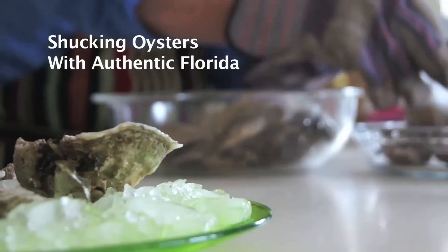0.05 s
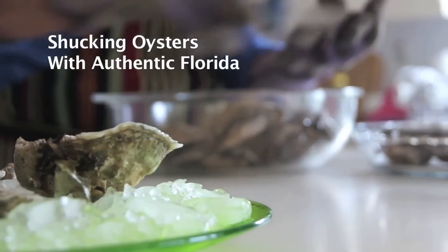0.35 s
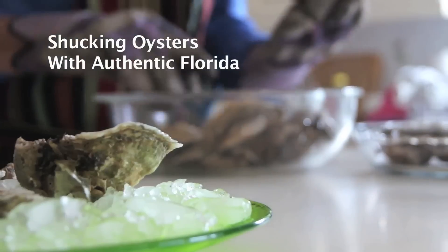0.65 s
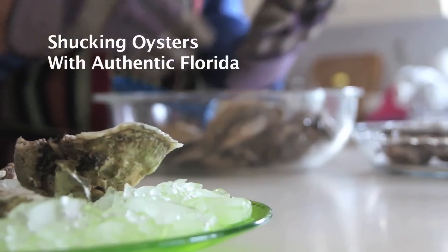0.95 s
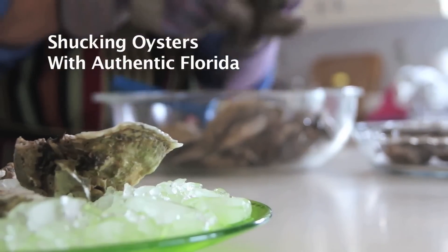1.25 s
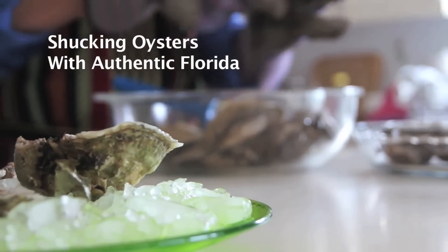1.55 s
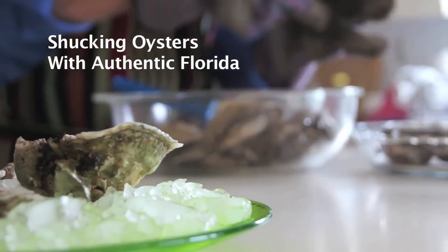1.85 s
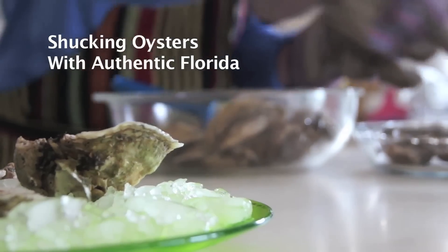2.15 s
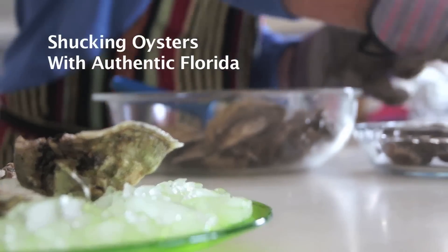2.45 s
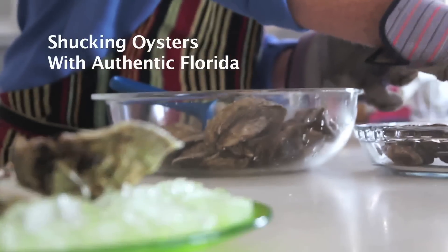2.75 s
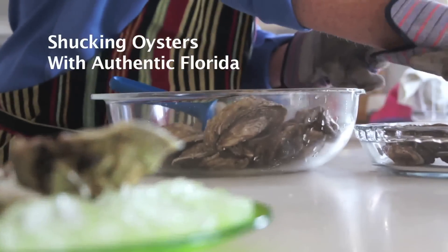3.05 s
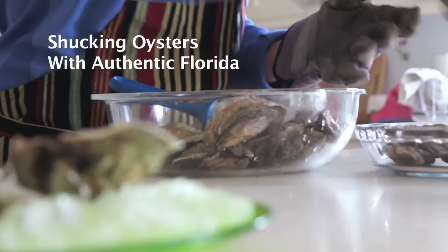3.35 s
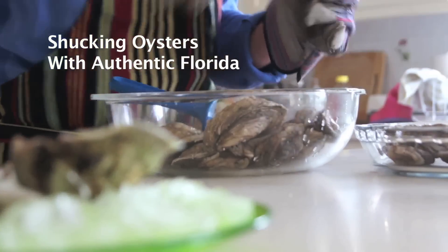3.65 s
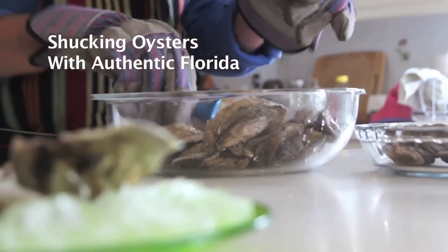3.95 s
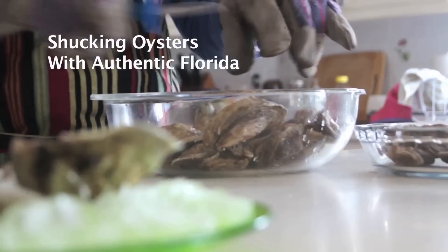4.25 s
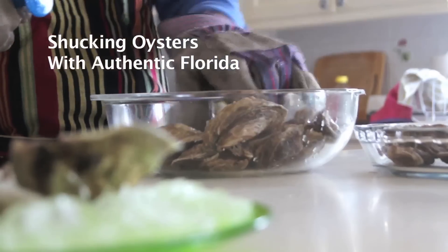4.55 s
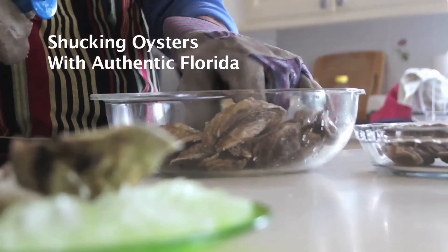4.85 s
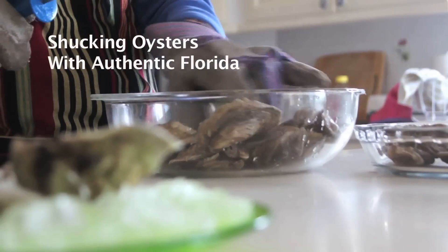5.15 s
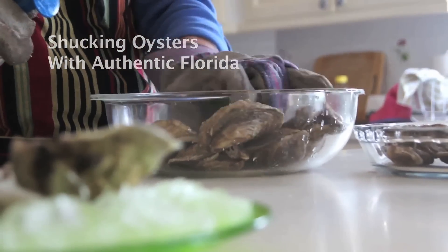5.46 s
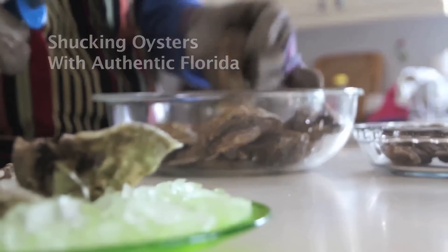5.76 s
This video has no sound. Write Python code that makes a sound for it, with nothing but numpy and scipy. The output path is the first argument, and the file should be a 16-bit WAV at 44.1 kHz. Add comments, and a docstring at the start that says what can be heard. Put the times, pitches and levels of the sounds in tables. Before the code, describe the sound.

Sharp shell clinks and a falling steel knife, followed by a hand rummaging through hollow, knocking oysters in a hard-walled kitchen.

```python
"""Clinks, knocks and scrapes of oysters being shucked on a stone counter in a hard-walled kitchen.
An empty top shell bounces, the steel knife drops among whole oysters, half shells clink into a glass
dish. The knife is picked up, and a gloved hand rummages in the bowl of oysters, which knock and scrape.
Hard contacts crack and ring; closed, wet oysters thud. Strong room sound over a faint hiss."""
import sys
import numpy as np
from scipy import signal
from scipy.fft import rfft, irfft, next_fast_len
from scipy.io import wavfile

SR = 44100
rng = np.random.default_rng(int(sys.argv[2]) if len(sys.argv) > 2 else 0)


def generate_wav(sig):
    """Save sig (samples, or channels by samples) to the path in sys.argv[1] as 16-bit PCM at SR."""
    pcm = np.round(np.clip(np.atleast_2d(sig).T, -1, 1) * 32767).astype(np.int16)
    wavfile.write(sys.argv[1], SR, pcm)


N = 260549
BLOW_SAMPLES = 2 ** 15
AGE_S = np.arange(BLOW_SAMPLES) / SR

# Stereo width of the room. Each row: frequency in Hz, side level against the middle in dB.
ROOM_WIDTH = [(100, -11), (300, -9.5), (600, -7.5), (1200, -4.5), (2500, 0.5), (12000, 1)]
# Oyster spectra: hollow body, lips, flakes. Each row: frequency in Hz, relative level in dB.
THUD_SPECTRUM = [(40, -37), (110, -18.5), (190, -16.5), (380, -8), (540, -6), (720, 0.5), (1100, -1.5),
                 (1500, -9), (2500, -30.5), (4000, -32.5), (12000, -60)]
CLACK_SPECTRUM = [(40, -34), (1100, -8), (1500, 0.5), (1830, 10), (2100, -0.5), (2800, -9), (3600, -19.5),
                  (12000, -64)]
GRIT_SPECTRUM = [(40, -40.5), (1500, -12), (2800, 9.5), (3400, -1.5), (4300, 4), (6500, -8), (9000, -16.5),
                 (13500, -36)]


def undb(db):
    """Decibels to gain."""
    return 10 ** (np.asarray(db) / 20)


def along(points, hz):
    """Read (Hz, value) points on a log-frequency axis."""
    point_hz, value = np.transpose(points)
    return np.interp(np.log(hz + 1), np.log(point_hz), value)


def bins_hz(size):
    """Frequencies of a real spectrum."""
    return np.arange(size // 2 + 1) * SR / size


def colour(x, spectrum, tilt_db_per_oct=0):
    """Minimum-phase filter with the given spectrum, tilted above 3 kHz."""
    size = next_fast_len(len(x) + BLOW_SAMPLES, True) // 2 * 2
    hz = bins_hz(size)
    db = along(spectrum, hz) + tilt_db_per_oct * np.log2(np.maximum(hz / 3000, 1))
    cepstrum = irfft(np.log(undb(db)))
    cepstrum[1:size // 2] *= 2
    cepstrum[size // 2 + 1:] = 0
    return irfft(rfft(x, size) * np.exp(rfft(cepstrum)))[:len(x)]


def butter(x, order, hz, kind="low"):
    """Butterworth filter."""
    return signal.sosfilt(signal.butter(order, hz, kind, fs=SR, output="sos"), x)


def unit(x):
    """Scale to rms 1."""
    return x / np.sqrt(np.mean(x ** 2))


def punch(x):
    """Scale a blow to the energy of 4 ms at rms 1."""
    return x / np.sqrt(np.sum(x ** 2) / (0.004 * SR))


def add(track, start_s, sound):
    """Mix a sound in at start_s."""
    start = max(int(start_s * SR), 0)
    track[start:start + len(sound)] += sound[:max(N - start, 0)]


def fade(t60_s, rise_s=0.0001):
    """Quick rise, exponential decay."""
    return np.exp(-np.log(1000) * AGE_S / t60_s) * (1 - np.exp(-AGE_S / rise_s))


def room_noise(size):
    """Stereo noise, alike in the bass and apart in the treble."""
    mid, side = rfft(rng.standard_normal((2, size)))
    width = undb(along(ROOM_WIDTH, bins_hz(size)))
    side = side * width
    return irfft(np.array([mid + side, mid - side]) / np.sqrt(1 + width ** 2), size)


def hiss(level_db=-56.5):
    """Steady air noise of the room and the microphone's own hiss."""
    # Each row: frequency in Hz, relative level in dB.
    spectrum = [(26, -45), (45, -15), (92, -31), (236, -8.5), (266, -12), (300, -7), (574, -4), (784, -4.5),
                (1100, -6), (1400, -11), (1910, -12), (2420, -17), (2670, -16), (4020, -15.5), (14000, -33)]
    return undb(level_db) * unit(np.array([colour(x, spectrum) for x in room_noise(N)]))


def kitchen(x, tail_db=-1.5, scatter_db=-3, left_db=1.3):
    """Direct sound, a few hard reflections, scatter from things on the counter, a diffuse tail."""
    # Reverberation. Each row: frequency in Hz, T60 in seconds.
    decays = [(150, 0.57), (400, 0.88), (1000, 0.87), (2800, 0.83), (7000, 0.72), (13000, 0.36)]
    # Counter and cupboard reflections. Each row: delay in seconds, left gain in dB, right gain in dB.
    echoes = [(.0057, -6.5, -4), (0.0105, -10, -7.5), (0.0192, -17, -9.5), (0.028, -10.5, -11)]
    noise_spectrum = rfft(room_noise(BLOW_SAMPLES))
    tail = 0
    for band_hz, t60_s in decays:
        band = along([(hz, hz == band_hz) for hz, _ in decays], bins_hz(BLOW_SAMPLES))
        tail = tail + irfft(noise_spectrum * band) * fade(t60_s)
    tail *= 1 - np.exp(-AGE_S / 0.0022)  # build-up
    scatter = room_noise(BLOW_SAMPLES) * fade(t60_s=0.14)
    response = (undb(tail_db) * unit(tail) + undb(scatter_db) * unit(scatter)) / np.sqrt(BLOW_SAMPLES)
    response[:, 0] += 1
    for delay_s, *gains_db in echoes:
        response[:, int(delay_s * SR)] += undb(gains_db)
    return signal.fftconvolve(x[None], response, axes=1)[:, :N] * undb([[left_db], [0]])


def stroke(start_s, length_s, attack_s=0.011, release_s=0.017):
    """A sliding shell takes up speed, holds it while pushed, then comes to rest."""
    age_s = np.arange(N) / SR - start_s
    return np.clip(age_s / attack_s, 0, 1) * np.exp(-np.maximum(age_s - length_s, 0) / release_s)


def skid(start_s=5.155, length_s=0.03, start_hz=4310, rise_hz_per_s=55000, width_hz=1400, db=-51.5):
    """A gritty squeak that rises as a shell's edge speeds up."""
    hz = start_hz + rise_hz_per_s * np.clip(np.arange(N) / SR - start_s, 0, length_s)
    tone = np.sqrt(2) * np.sin(2 * np.pi * np.cumsum(hz) / SR)
    roughness = unit(butter(rng.standard_normal(N), 2, width_hz / 2))
    return undb(db) * stroke(start_s, length_s) * roughness * tone


def scraping(slips_per_s=800, spread_db=3.5, thud_db=-10, clack_db=-16, grit_gain_db=-8):
    """Ridges catch and slip as shells slide: many tiny blows into the same shell bodies."""
    # Pushes. Each row: start in seconds, length in seconds, relative body and grit levels in dB.
    slides = [(0.783, 0.063, -35.5, -45.5), (4.554, 0.012, -31.5, -51), (4.751, 0.024, -32.5, -46.5),
              (4.775, 0.01, -46, -41.5), (4.81, 0.069, -34.5, -55), (4.895, 0.038, -33.5, -57),
              (5.019, .025, -32, -54), (5.085, 0.13, -29, -45.5), (5.31, 0.16, -33.5, -52.5),
              (5.589, 0.073, -33, -55), (5.678, 0.021, -29, -38)]
    body_envelope, grit_envelope = sum(undb([[body_db], [grit_db]]) * stroke(start_s, length_s)
                                       for start_s, length_s, body_db, grit_db in slides)
    sizes = undb(spread_db * np.minimum(rng.exponential(size=N), 4))
    signs = np.sign(rng.standard_normal(N))
    slips = sizes * signs * (rng.random(N) < slips_per_s / SR)
    thud = undb(thud_db) * unit(colour(slips, THUD_SPECTRUM))
    clack = undb(clack_db) * unit(colour(slips, CLACK_SPECTRUM))
    grit = undb(grit_gain_db) * unit(colour(slips, GRIT_SPECTRUM))
    return body_envelope * (thud + clack) + grit_envelope * grit


def ring(modes, draws, detune, scatter_db=0.5):
    """Damped modes: the striking point varies their shares, the load of shells their pitch."""
    hz, db, t60_s = np.transpose(modes)
    share, shift, polarity = draws[:3 * len(modes)].reshape(-1, 3).T
    gains = np.sign(polarity) * undb(db + scatter_db * share)
    gains *= np.sqrt(2 / np.sum(gains ** 2))
    hz = hz * (1 + detune * shift)
    return sum(gain * np.sin(2 * np.pi * mode_hz * AGE_S) * fade(decay_s)
               for gain, mode_hz, decay_s in zip(gains, hz, t60_s))


def clinks(hits, modes, crack_spectrum, crack_t60_s, note_t60_s, detune):
    """Shell meets something hard: the edge cracks, the shell gives a short note, the object rings on."""
    # Each hit: start in seconds, relative level in dB, treble tilt in dB/octave, ring in dB,
    # note in Hz, note in dB. Each mode: frequency in Hz, relative level in dB, T60 in seconds.
    # Each crack_spectrum row: frequency in Hz, relative level in dB.
    track = np.zeros(N)
    for start_s, db, tilt_db_per_oct, ring_db, note_hz, note_db in hits:
        noise, draws = rng.standard_normal((2, BLOW_SAMPLES))
        crack = punch(colour(noise * fade(crack_t60_s), crack_spectrum, tilt_db_per_oct))
        note = undb(note_db) * punch(np.sin(2 * np.pi * note_hz * AGE_S) * fade(note_t60_s))
        ringing = undb(ring_db) * ring(modes, draws, detune)
        add(track, start_s, undb(db) * (crack + note + ringing))
    return track


def top_shell():
    """A thin, empty top shell bounces and rings."""
    # Bounces, shell modes, contact spectrum. Columns as in clinks().
    hits = [(.0195, -16.5, -2, -13.5, 2910, -17), (.038, -31, 1, -7, 3900, 1),
            (.046, -23, -3.5, -10.5, 3000, -10), (.1053, -16.5, -7, -2, 3930, 6),
            (.127, -21.5, -17.5, -5.5, 3270, 0)]
    modes = [(2708, 1.5, 0.07), (2912, 19, 0.11), (3000, -13, 0.15), (3200, -2, 0.047), (3310, -25.5, 0.11),
             (3787, -15, 0.22), (3630, -0.5, .07), (4100, -2.5, 0.06), (4280, -13.5, 0.021),
             (5220, -12.5, 0.081), (6750, -16.5, 0.11)]
    crack_spectrum = [(40, -11), (110, -13), (190, -5.5), (420, -2.5), (600, -2.5), (900, 3.5), (1300, 2),
                      (2000, -8), (3000, -2), (4200, 7.5), (5200, -1.5), (7200, 1), (8300, -16.5),
                      (13000, -19)]
    return clinks(hits, modes, crack_spectrum, crack_t60_s=0.023, note_t60_s=0.026, detune=0.0033)


def knife():
    """The steel knife rings as it lands among the oysters, and faintly when picked up."""
    # Contacts, steel modes, contact spectrum. Columns as in clinks().
    hits = [(.637, -33, 7, -30, 1076, 4), (.642, -17, 1, -31, 1152, -5.5), (.649, -25, 7, -4, 5800, -8),
            (.671, -19.5, 5.5, -18, 5020, -1), (.778, -31, -4, -22, 3584, 1),
            (.839, -29.5, -3, -24, 6720, -3), (3.94, -37, -11, -23, 3214, -26),
            (3.997, -46, -13, -15, 6600, -10)]
    modes = [(3305, 1, 0.14), (4940, -2, 0.18), (5470, -7, 0.16), (6760, -9, 0.25), (7140, -1, 0.16),
             (7900, -7, .05), (9300, -11, 0.14), (12530, -3, .06)]
    crack_spectrum = [(40, -20), (110, -31), (220, -25), (450, -19.5), (1000, -9.5), (2000, -9.5),
                      (4000, -15), (8500, -21), (10000, -29), (13500, -45)]
    return clinks(hits, modes, crack_spectrum, crack_t60_s=0.064, note_t60_s=0.074, detune=0.0012)


def glass_dish(rock_s=0.0057, lip_pitch_ratio=1.47):
    """Half shells land on the thick hinge, then rock onto the thin lip: softer, brighter, higher."""
    # Landings, glass modes, contact spectrum. Columns as in clinks().
    hinges = [(.0995, -17.5, -7.5, 3.5, 1663, 2), (2.5385, -17.5, 1.5, -10.5, 1848, -5),
              (2.7355, -34, -3, -9.5, 1920, -1.5), (2.9505, -13.5, -3, -6, 1690, 0.5),
              (2.960, -18.5, -2, -4, 2757, 6.5), (2.9824, -14.5, -5.5, -3.5, 2733, 5.5),
              (3.007, -26.5, -0.5, -1, 2610, -1.5), (3.027, -17.5, -9.5, -10.5, 1820, -2)]
    modes = [(419.5, -8.5, 0.16), (793.6, -12.5, 0.086), (1639, 1, 0.074), (1845, -18.5, 0.1),
             (2610, -12, .15), (2623, 4, 0.12), (2750, -5.5, 0.47), (2823, 0.5, 0.1), (2800, -11, 0.17),
             (4062, -8.5, 0.12), (4235, -15, 0.11), (4950, -18, .05), (5376, -14.5, 0.14),
             (5620, -13, 0.08), (5930, -21, 0.098), (7150, -22, 0.1023), (8270, -21.5, 0.0618)]
    crack_spectrum = [(40, -12.5), (110, -24.5), (190, -8), (300, -10.5), (420, -1.5), (560, -2),
                      (900, 7.5), (2000, 0.5), (3000, -1.5), (3700, -19), (5400, -12), (7800, -20.5),
                      (9200, -34.5), (13000, -40)]
    lips = [(start_s + rock_s, db - 3.5, tilt + 2, ring_db, note_hz * lip_pitch_ratio, note_db - 3.5)
            for start_s, db, tilt, ring_db, note_hz, note_db in hinges]
    return clinks(hinges + lips, modes, crack_spectrum, crack_t60_s=0.032, note_t60_s=0.026, detune=0.0023)


def oyster_knocks(contact_s=0.00037, thud_db=-7, note_db=-8.5, clack_db=1.5):
    """Closed, wet oysters are heavily damped: hollow thud and note, clack of lips, crunch of flakes."""
    # Each row: start in seconds, relative level in dB, shell note in Hz,
    # edge in dB (high when lips meet, low for bellies).
    knocks = [(.738, -15, 920, -6), (.777, -21, 1110, -6.5), (.888, -22.5, 880, -29),
              (1.036, -31.5, 1162, -13.5), (3.928, -32, 917, -18), (3.964, -32, 688, -28),
              (4.148, -37.5, 827, -33), (4.574, -22, 893, -10), (4.71, -31, 885, -25),
              (4.792, -23, 1155, -26), (4.831, -20.5, 1826, -9), (4.854, -20, 1770, -16),
              (4.882, -18.5, 825, -22), (4.9, -20.5, 980, -6.5), (4.911, -14, 1755, -21),
              (5.019, -15.5, 1860, -5.5), (5.108, -21.5, 1877, -8), (5.136, -14.5, 860, -13),
              (5.3, -26, 886, -14), (5.319, -23, 830, -8.5), (5.351, -14.5, 962, -15),
              (5.386, -9, 1076, -21), (5.516, -8.5, 918, -22), (5.613, -17, 1730, -15.5),
              (5.668, -16, 888, -34), (5.692, -15, 905, -36.5)]
    thud_fade, note_fade = fade(0.019, contact_s), fade(0.022, contact_s)
    clack_fade, grit_fade = fade(0.016, contact_s), fade(0.088, contact_s)
    track = np.zeros(N)
    for start_s, db, note_hz, edge_db in knocks:
        thud_noise, clack_noise, grit_noise = rng.standard_normal((3, BLOW_SAMPLES))
        thud = undb(thud_db) * punch(colour(thud_noise * thud_fade, THUD_SPECTRUM))
        note = undb(note_db) * punch(np.sin(2 * np.pi * note_hz * AGE_S) * note_fade)
        clack = undb(clack_db + edge_db) * punch(colour(clack_noise * clack_fade, CLACK_SPECTRUM))
        grit_db = -26 + 0.37 * db + 0.69 * edge_db  # grows more slowly than the blow; most at the lips
        crunch = grit_noise * np.abs(grit_noise) * grit_fade
        grit = undb(grit_db) * punch(colour(crunch, GRIT_SPECTRUM))
        add(track, start_s, undb(db) * (thud + note + clack) + grit)
    return track


def scene():
    """Small objects radiate almost no bass, but hard landings thump faintly through the counter."""
    landings = undb(-3.5) * top_shell() + undb(-5.5) * glass_dish() + undb(-7) * knife()
    oysters = undb(-5.5) * oyster_knocks() + scraping() + skid()
    airborne = butter(landings + oysters, order=4, hz=175, kind="high")
    thump = undb(-6) * butter(landings, order=2, hz=90)
    return kitchen(airborne) + thump + hiss()


def record(dry, ceiling=0.95, top_hz=14100):
    """The microphone's housing hollows out three bands; peaks are rounded and the top is cut."""
    # Each row: centre in Hz, half-width in Hz, gain in dB.
    hollows = [(599, 63, -8), (1344, 120, -13.5), (2368, 120, -23.5)]
    for hz, half_width_hz, db in hollows:
        b, a = signal.iirpeak(hz, hz / (2 * half_width_hz), fs=SR)
        dry = dry + (undb(db) - 1) * signal.lfilter(b, a, dry)
    rounded = dry / (1 + (dry / ceiling) ** 8) ** (1 / 8)
    return signal.sosfilt(signal.ellip(10, 0.2, 70, top_hz, fs=SR, output="sos"), rounded)


dry = scene()
out = record(dry)
generate_wav(out)
```